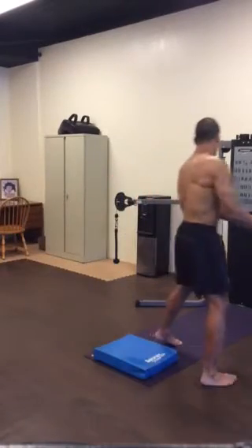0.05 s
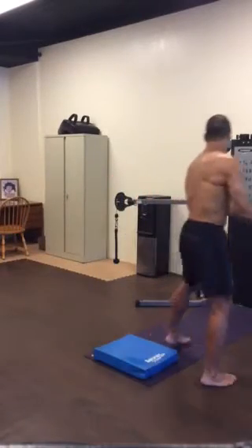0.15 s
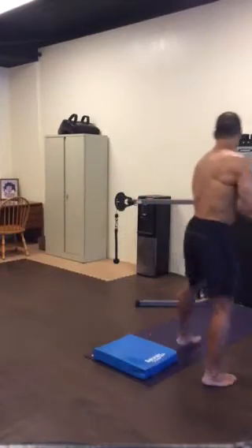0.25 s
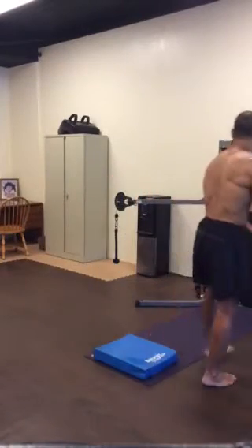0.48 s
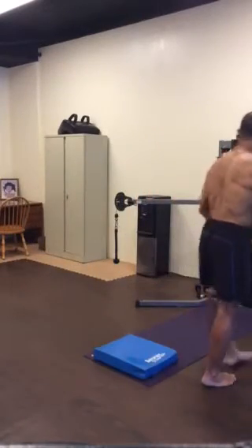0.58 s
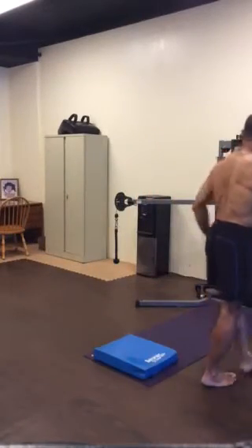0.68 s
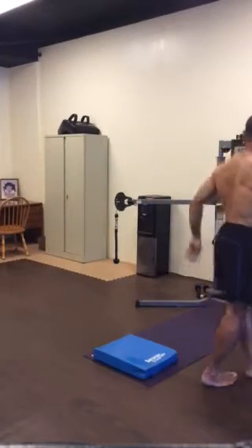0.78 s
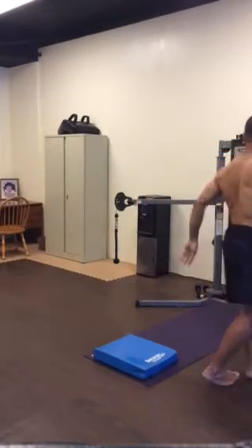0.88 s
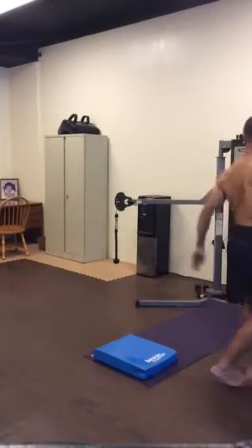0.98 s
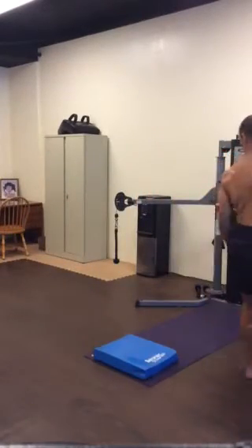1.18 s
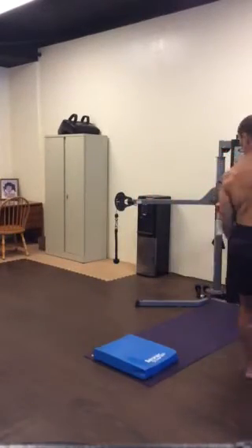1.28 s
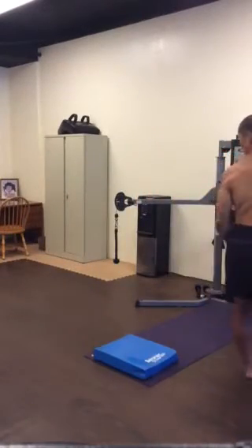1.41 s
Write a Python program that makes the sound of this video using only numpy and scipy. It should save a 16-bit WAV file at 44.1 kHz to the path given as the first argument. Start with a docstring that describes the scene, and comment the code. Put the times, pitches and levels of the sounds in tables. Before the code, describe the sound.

A gym machine's iron weight stack crashes down, rattling and ringing in an echoing room.

```python
"""A soft footfall, then the crash of a cable machine's iron weight stack in a bare, echoing gym.
The plates slide down their rods, slap together in a quick run, rattle and set the frame ringing;
loose steel fittings clink and a hook taps the frame. One microphone stands across the room, so the
clatter arrives mostly off the walls. The thuds of bare feet and the hook sound closer and drier.
Low ventilation hum lies under it all."""
import sys
import numpy as np
from scipy import signal
from scipy.fft import rfft, irfft
from scipy.io import wavfile

SR = 44100
rng = np.random.default_rng(int(sys.argv[2]) if len(sys.argv) > 2 else 0)


def persist_wave(psi):
    """Save psi, clipped to +-1, as 16-bit WAV."""
    counts = np.round(np.clip(psi, -1, 1) * 32767).astype(np.int16)
    wavfile.write(sys.argv[1], SR, np.atleast_2d(counts).T)


N = 63945
T = np.arange(N) / SR

# The gym's echo. Each row: frequency in Hz, seconds to fall by 60 dB (T60).
ROOM_T60 = [(60, 1.3), (250, 0.89), (600, 1.22), (1500, 1.232), (4000, 1.28), (6000, 0.91), (8500, 0.63),
            (14000, 0.46)]
# Mains hum of the ventilation. Each row: frequency in Hz, level in dB.
MAINS_HUM = [(59.5, -73), (119, -64)]

# The tone colour of each noise. Each row: frequency in Hz, relative spectral density in dB.
AIR_SPECTRUM = [(25, -18), (55, -4.5), (120, 0.5), (200, -1.5), (320, -1), (600, -9.5), (1200, -15.5),
                (2500, -19), (5000, -21.5), (8000, -28), (11000, -35), (15000, -58)]   # moving air
STEP_SPECTRUM = [(20, -20), (42, -15.5), (60, 4.5), (85, -13), (120, 2.5), (190, -15), (320, -13),
                 (600, -26.5), (2000, -38), (16000, -49)]   # bare sole on the floor
NUDGE_SPECTRUM = [(1000, -39), (4000, -10), (5500, 6.5), (6700, 1.5), (7800, -2), (9500, -11.5),
                  (11000, -23), (16000, -34)]   # hook being nudged
TICK_SPECTRUM = [(1500, -5), (4500, -1.5), (5950, 12), (7000, -1), (9500, -15), (12000, -17), (16000, -30)]   # contact of a small fitting
SLIDE_SPECTRUM = [(100, -22), (270, -9.5), (305, 10), (345, -8.5), (700, -44), (1200, -24), (1900, -18.5),
                  (2800, -36), (8000, -44), (16000, -52)]   # friction on the guide rods
TOUCH_SPECTRUM = [(100, -32), (600, -1), (1800, -9), (2600, -4), (3100, -1), (3800, -9), (6000, -8),
                  (8000, -14), (10000, -39), (16000, -47)]   # first touch of the top plate
THUMP_SPECTRUM = [(50, -36), (180, -23.5), (245, -6.5), (285, 0), (325, -7), (420, -15.5), (1000, -30.5),
                  (16000, -73)]   # full weight meeting the frame
CLACK_SPECTRUM = [(40, -41), (130, -16), (215, -4), (300, 1), (430, -4), (850, -6.5), (1110, 1), (1300, -4),
                  (1600, -2.5), (1880, 1.5), (2400, -3), (3500, -2.5), (4300, -0.5), (4750, 0), (5600, -3),
                  (7700, -8.5), (8450, -3), (8900, -9.5), (9350, -4), (10100, -14), (12000, -19),
                  (13200, -36), (14300, -21), (15000, -44), (16000, -40)]   # plate on plate

# Small impacts around the room. Each row: start in seconds, relative level in dB.
FOOTFALLS = [(.01, -17), (0.384, -8.5), (.52, -34), (0.662, -41), (0.912, -28), (1.117, -25),
             (1.216, -25.5), (1.319, -24)]
HOOK_TAPS = [(1.207, -23.5), (1.224, -34), (1.280, -37.5)]
FITTING_CLINKS = [(.519, -8.5), (.556, -17.5), (0.621, -17.5)]
# Plates landing on each other. Each row: start in seconds, relative level in dB, treble lift in dB.
PLATE_HITS = [(.2168, 4, 2.5), (.2195, 6.5, 0), (0.2263, 3, 4), (0.2369, 1.5, -8), (0.2497, -2.5, -8),
              (.270, -0.5, -18), (.285, .5, -3.5), (0.2964, -.5, -5), (0.3057, -0.5, -9), (.344, -4.5, -4),
              (.382, -5.5, -20), (.430, -9, -1), (.473, -11, -6), (.523, -8, -17), (.571, -8, -19)]

# Resonances of the metal parts. Each row: frequency in Hz, relative level in dB, T60 in seconds.
HOOK_MODES = [(5083, -6, .3), (5156, -1, .3), (5265, -8, .25), (6013, -11, .4), (6282, -11, .4)]
FITTING_MODES = [(5400, -14, .1), (5740, -13, .06), (5880, -12, .06), (5985, -13, .07), (6282, -13, .1),
                 (6560, -16, .08), (7644, -22, .2)]
STACK_MODES = [(196, -24, .7), (274, -19, .25), (314, -22, .4), (507, -26, .6), (1056, -22, .35),
               (1115, -16.5, .35), (1178, -20, .35), (1362, -26, .5), (1736, -23, .6), (1842, -20, .6),
               (1935, -23, .45), (3010, -24, .8), (3800, -23, .9), (3904, -20.5, .7), (4560, -21.5, .4),
               (4698, -18.5, .6), (4768, -20, .45), (5144, -21, .4), (6706, -23, .35), (8340, -18, .3),
               (9254, -25, .25)]   # plates and frame together

CONTACT_T60_S = 0.029   # metal on metal


def amp(db):
    """Decibels to gain."""
    return 10 ** (np.asarray(db) / 20)


def unit(x):
    """Scale to energy one."""
    return x / np.sqrt(np.sum(x ** 2) + 1e-20)


def at_hz(points, hz):
    """Read a table on a log-frequency axis."""
    freqs, values = np.transpose(points)
    return np.interp(np.log(np.maximum(hz, 1)), np.log(freqs), values)


def through(x, response):
    """Pass a sound through an impulse response."""
    return signal.fftconvolve(x, response)[:N]


def colour(spectrum):
    """Minimum-phase impulse response with the given spectrum, energy one."""
    size = 2 ** 13
    hz = np.arange(size // 2 + 1) * SR / size
    cepstrum = irfft(np.log(amp(at_hz(spectrum, hz))))
    cepstrum[1:size // 2] *= 2
    cepstrum[size // 2 + 1:] = 0
    return unit(irfft(np.exp(rfft(cepstrum))))


def dying(start, t60):
    """Envelope that jumps up and dies away."""
    return (T >= start) * amp(-60 * np.clip((T - start) / t60, 0, 10))


def burst(start, t60=CONTACT_T60_S):
    """A rough contact: a short puff of noise, energy one."""
    return unit(rng.standard_normal(N) * dying(start, t60))


def knock(spectrum, start, db, t60=CONTACT_T60_S):
    """One contact on a part that has its own colour."""
    return amp(db) * through(burst(start, t60), colour(spectrum))


def ringing(hits, modes, scatter_db=2):
    """Every hit sets every mode ringing with a strength of its own."""
    starts, db = np.transpose(hits)[:2]
    strengths = amp(db[:, None] + scatter_db * rng.standard_normal((len(starts), len(modes))))
    out = np.zeros(N)
    for k, (hz, mode_db, t60) in enumerate(modes):
        clicks = np.zeros(N)
        clicks[(starts * SR).astype(int)] = strengths[:, k] * rng.choice([-1, 1], len(starts))
        tone = through(clicks, np.sin(2 * np.pi * hz * T) * dying(0, t60))
        out += amp(mode_db) * np.linalg.norm(clicks) * unit(tone)
    return out


def gym_echoes(spots):
    """Wall echoes from several spots: half-octave bands of noise, each dying at its own rate."""
    edges = np.geomspace(28, 18000, 20)
    white, echoes = rng.standard_normal((2, spots, N)), np.zeros((spots, N))
    for k, (low, high) in enumerate(zip(edges, edges[1:])):
        bandpass = signal.butter(2, [low, high], "band", fs=SR, output="sos")
        t60 = at_hz(ROOM_T60, np.sqrt(low * high))
        echoes += signal.sosfilt(bandpass, white[k % 2]) * dying(0, t60)
    build_up = 1 - np.exp(-T / 0.00014)
    return [unit(echo) for echo in echoes * build_up]


def far_off(x, room, direct_db=-10.5):
    """A source far from the microphone: little direct sound, much echo."""
    return amp(direct_db) * x + through(x, room)


def ventilation():
    """The room tone: steady air noise and mains hum."""
    air = irfft(rfft(rng.standard_normal(N)) * rfft(colour(AIR_SPECTRUM), N), N)
    hum = sum(amp(db) * np.sin(2 * np.pi * (hz * T + rng.random())) for hz, db in MAINS_HUM)
    return amp(-59.5) * air + hum


def footsteps(soft_above_hz=2500):
    """Soft bare soles make dull thuds on the floor."""
    contacts = sum(amp(db) * burst(start, t60=0.052) for start, db in FOOTFALLS)
    thuds = through(contacts, colour(STEP_SPECTRUM))
    return amp(-5) * signal.sosfilt(signal.butter(2, soft_above_hz, fs=SR, output="sos"), thuds)


def hook():
    """A steel hook ticks as it is nudged, then rings as it swings against the frame."""
    nudge = knock(NUDGE_SPECTRUM, start=1.169, db=-31)
    taps = amp(-7) * ringing(HOOK_TAPS, HOOK_MODES)
    return nudge, taps


def fittings():
    """Loose, light steel parts tick on contact and ring."""
    contacts = sum(amp(db) * burst(start) for start, db in FITTING_CLINKS)
    ticks = amp(-3) * through(contacts, colour(TICK_SPECTRUM))
    return ticks + ringing(FITTING_CLINKS, FITTING_MODES)


def guide_rods(start=0.088, end=0.38):
    """Friction on the rods hums in the frame while the stack falls."""
    rubbing = rng.standard_normal(N) * (T > start) * (T < end)
    return amp(-53.5) * through(rubbing, colour(SLIDE_SPECTRUM))


def frame():
    """Each landing sets plates and frame ringing, and the full weight thumps into the frame."""
    ring = amp(-1) * ringing(PLATE_HITS, STACK_MODES)
    return ring + knock(THUMP_SPECTRUM, start=0.226, db=-3.5, t60=0.23)


def rattle(start=0.3, end=0.59, touches_per_s=90, fade_db_per_s=48):
    """Settling plates chatter in random, weakening touches."""
    touches = (rng.random(N) < touches_per_s / SR) * (T > start) * (T < end)
    return touches * rng.standard_normal(N) * amp(-12.5 - fade_db_per_s * (T - start))


def plates(rooms, hard_above_hz=3900):
    """The top plate clicks, then the plates slap together, hard landings brighter, and rattle."""
    click = knock(TOUCH_SPECTRUM, start=0.2082, db=-6.5)
    highpass = signal.butter(2, hard_above_hz, "high", fs=SR, output="sos")
    forces = np.zeros((len(rooms), N))
    for k, (start, db, lift_db) in enumerate(PLATE_HITS):
        contact = burst(start)
        treble = signal.sosfiltfilt(highpass, contact)
        path = k % len(rooms)   # landings take the echo paths in turn
        forces[path] += amp(db) * (contact + (amp(lift_db) - 1) * treble)
    forces[0] += rattle()
    clacks = through(sum(map(far_off, forces, rooms)), colour(CLACK_SPECTRUM))
    return far_off(click, rooms[0]) + amp(-2.5) * clacks


def scene():
    """At the microphone the clatter is mostly echo; frame, feet and hook taps are drier."""
    rooms, room_tone = gym_echoes(spots=2), ventilation()
    nudge, taps = hook()
    near = footsteps() + taps
    ring = frame()
    clatter = far_off(nudge + fittings() + guide_rods(), rooms[0]) + plates(rooms)
    echo = through(amp(-3) * ring + amp(-2) * near, rooms[1])
    return (room_tone + near + ring + clatter + echo)[None]


def record(dry):
    """The mono microphone channel cuts off steeply above 15.9 kHz."""
    return signal.sosfilt(signal.ellip(10, .1, 80, 15900, fs=SR, output="sos"), dry)


dry = scene()
out = record(dry)
persist_wave(out)
```